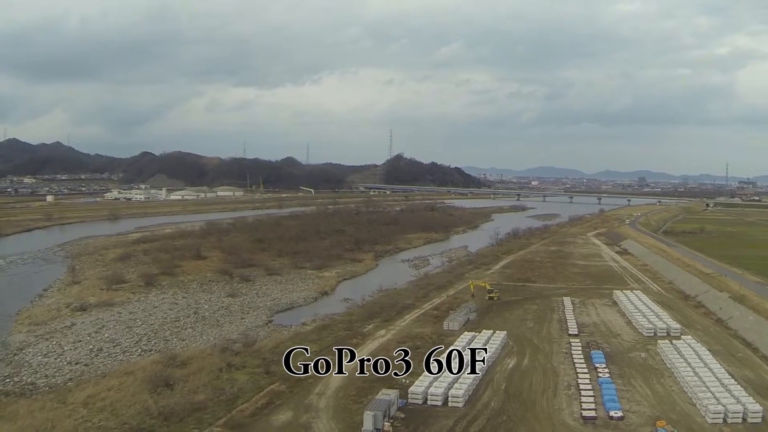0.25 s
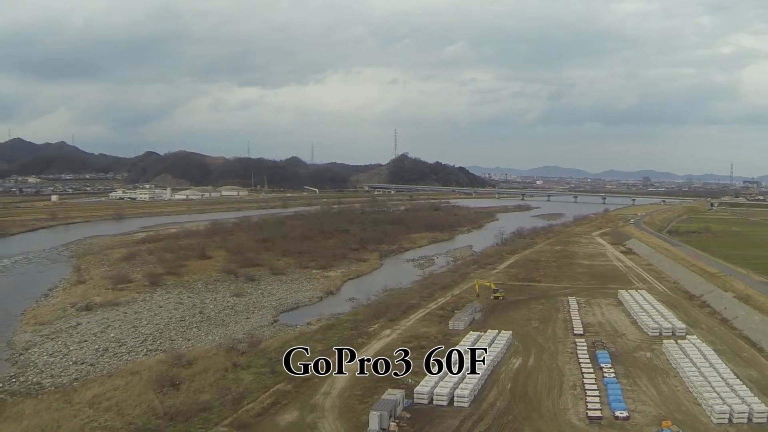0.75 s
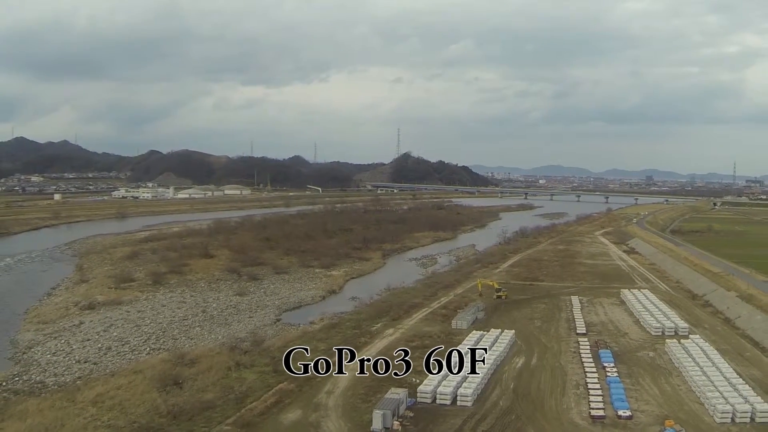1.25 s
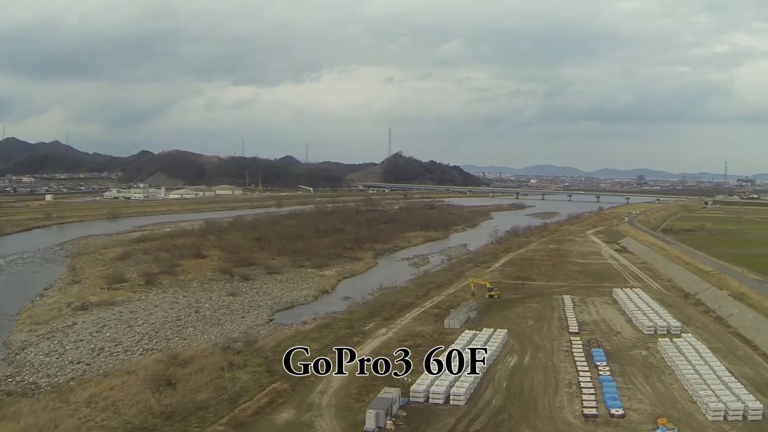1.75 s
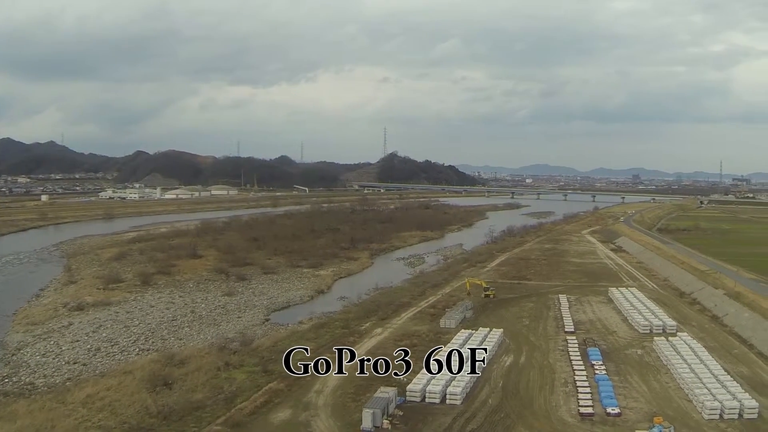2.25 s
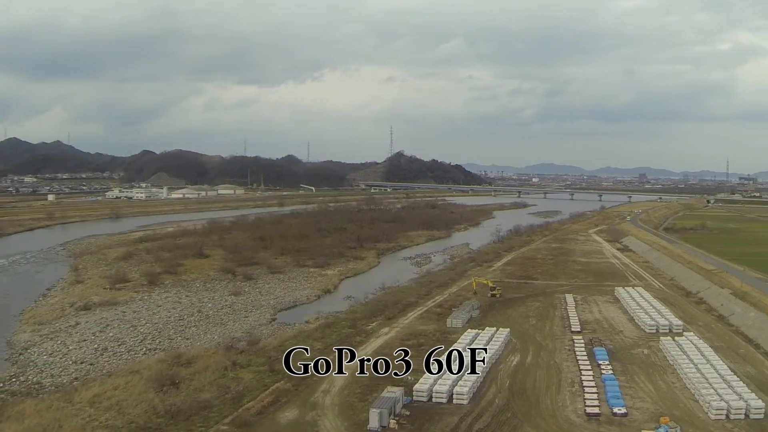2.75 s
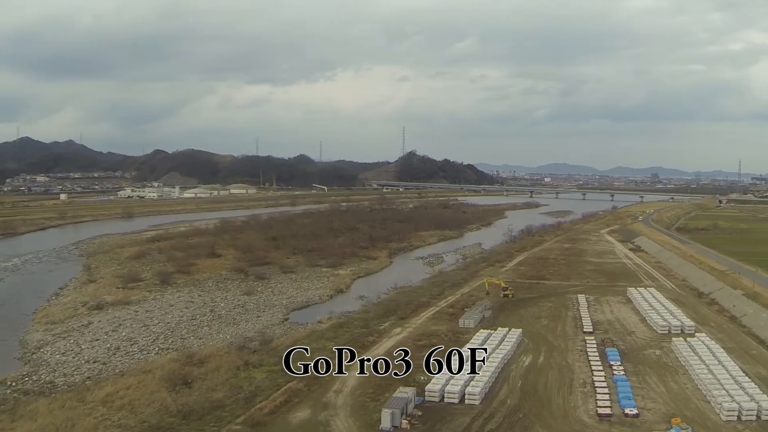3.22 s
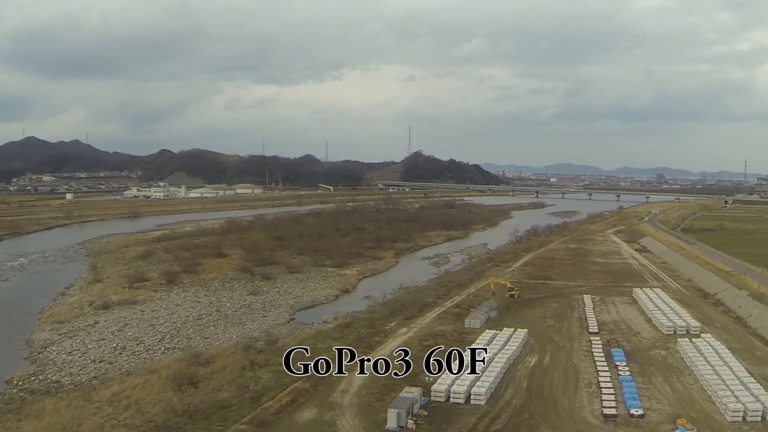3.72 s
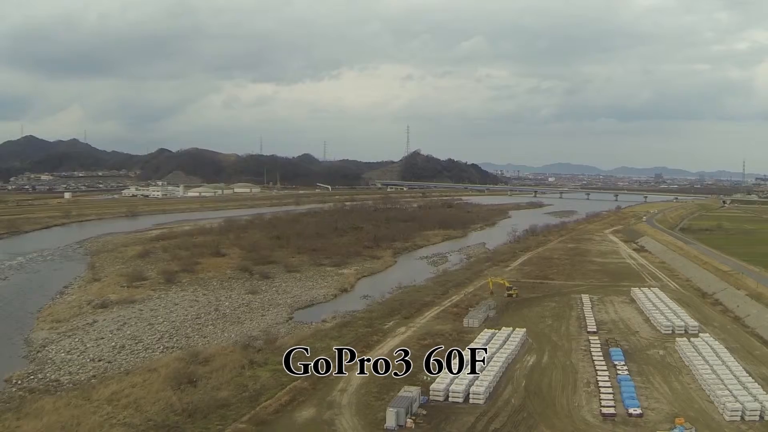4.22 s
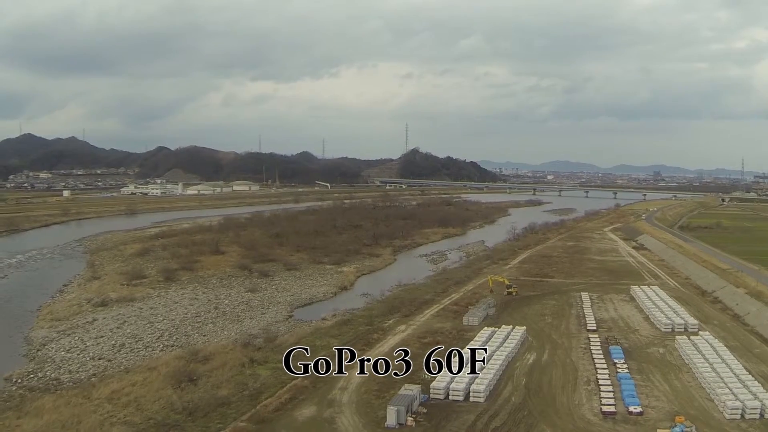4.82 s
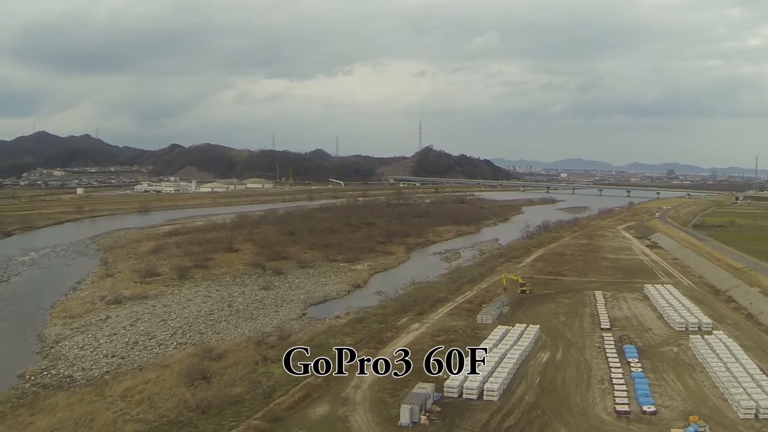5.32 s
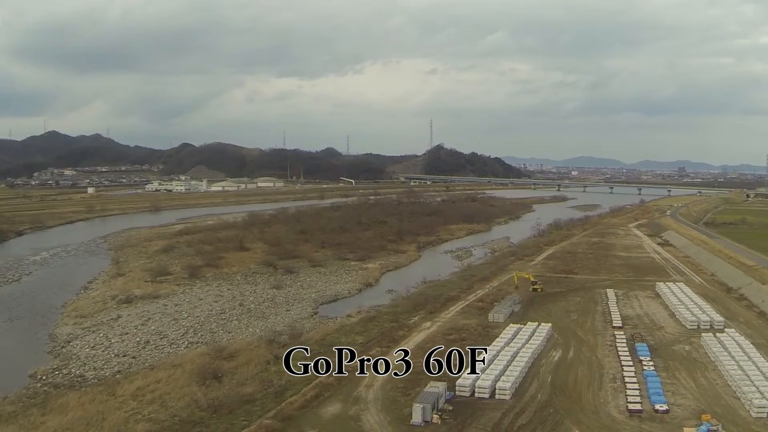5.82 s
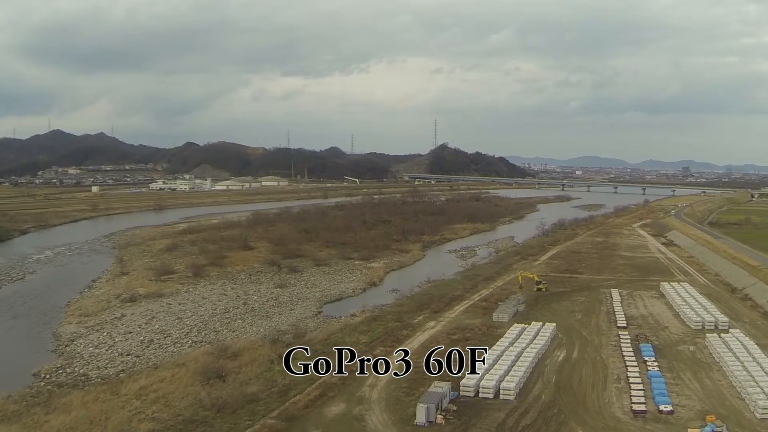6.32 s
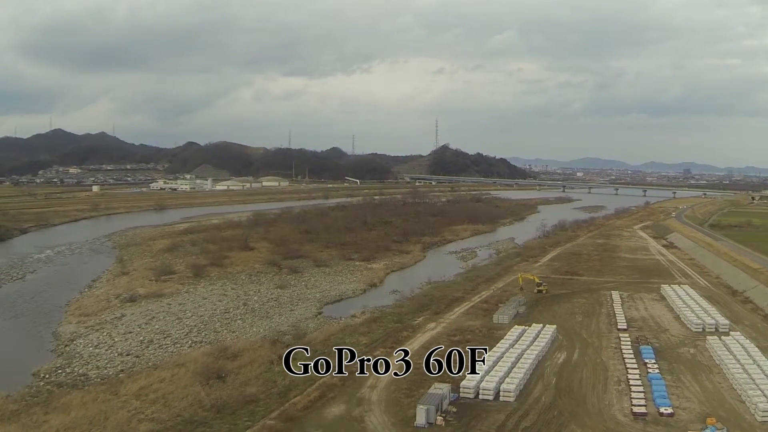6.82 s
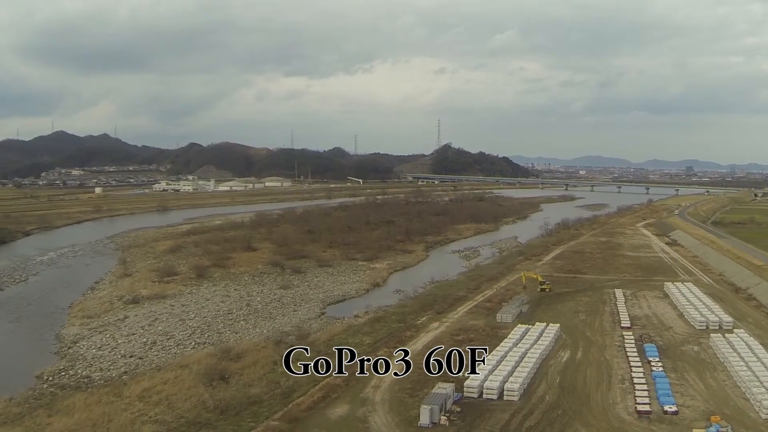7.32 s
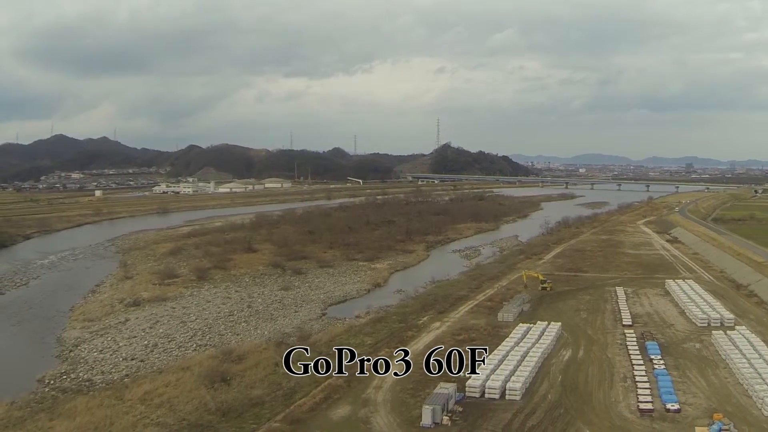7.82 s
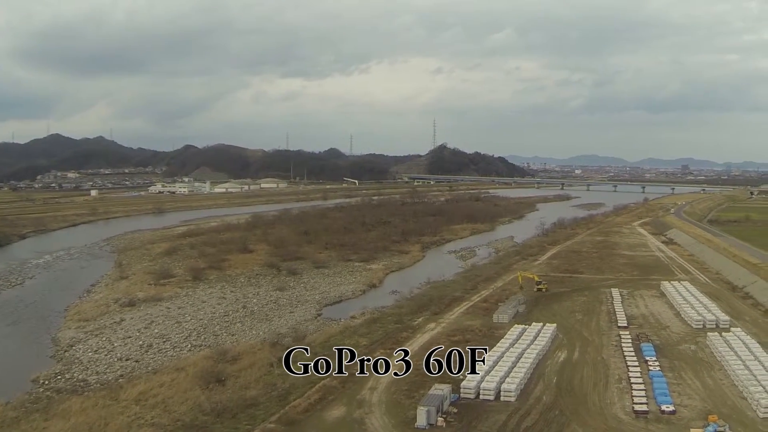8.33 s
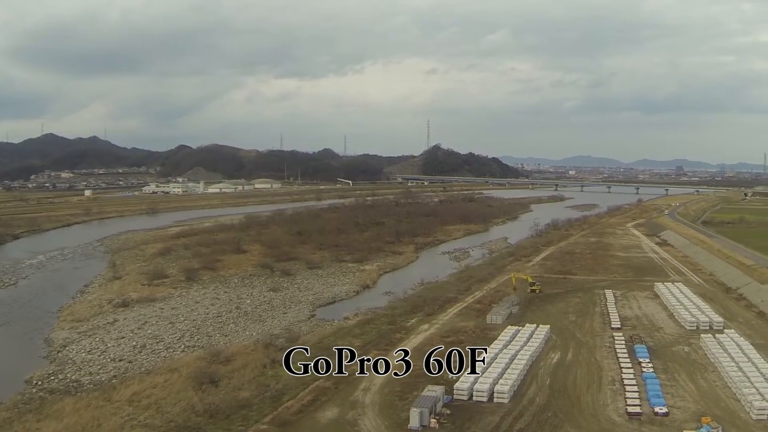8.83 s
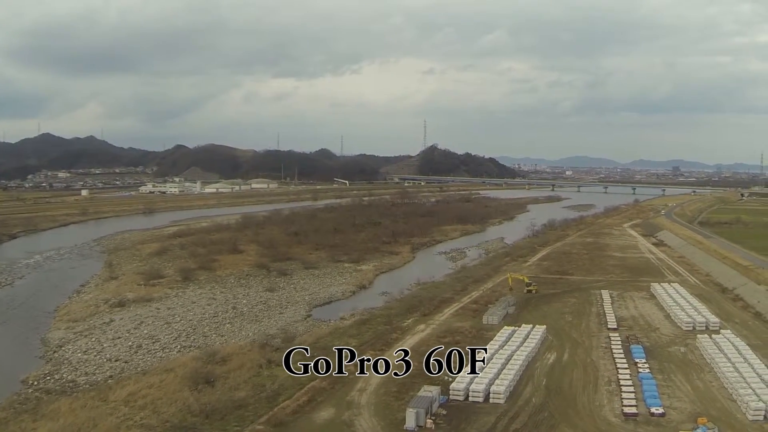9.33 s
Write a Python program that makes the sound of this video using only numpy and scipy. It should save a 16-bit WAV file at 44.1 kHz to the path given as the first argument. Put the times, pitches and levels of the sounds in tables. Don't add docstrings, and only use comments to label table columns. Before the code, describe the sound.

A continuous, very close propeller drone fills the sound, slightly detuned blades throbbing against one another, with rough fluttering air and steady piercing whistles high above. The opening wavers more and rushes roughly, then the hum settles. Open-air wind grows heavier, knocking and puffing against the craft-mounted microphone in irregular bursts until the end, its automatic level ducking and recovering. No distinct ground sounds emerge.

```python
import sys
import numpy as np
from scipy import signal
from scipy.fft import rfft, irfft
from scipy.io import wavfile
from scipy.ndimage import uniform_filter1d

SR = 44100
rng = np.random.default_rng(int(sys.argv[2]) if len(sys.argv) > 2 else 0)


def nominal_scale(level):
    x = np.asarray(level, float) / 20
    return 10 ** x


def file_out(sig):
    cols = np.atleast_2d(sig).T
    lim = np.clip(cols, -1, 1)
    pcm = np.round(lim * 32767).astype(np.int16)
    wavfile.write(sys.argv[1], SR, pcm)


N = 421596
T = np.arange(N) / SR

# t/s, f/Hz
NEAR_RATE = [(0.0, 195.55), (0.25, 187.7), (0.5, 200.89), (0.77, 188.02), (1.02, 193.13), (1.84, 190.04),
             (2.38, 191.28), (2.7, 181.46), (3.43, 188.85), (3.67, 196.11), (4.07, 191.74), (4.21, 195.7),
             (4.8, 194.0), (5.78, 201.08), (7.19, 199.85), (8.0, 201.65), (9.2, 192.9), (9.56, 196.5)]
SECOND_RATE = [(0.0, 178.05), (0.26, 175.12), (0.4, 181.99), (1.12, 172.57), (1.53, 181.21), (2.23, 181.49),
               (2.75, 175.72), (3.51, 171.01), (3.65, 173.38), (4.55, 175.53), (4.73, 178.62),
               (5.6, 169.37), (6.33, 167.22), (7.29, 167.09), (7.61, 169.27), (8.51, 171.68), (8.64, 173.3),
               (9.56, 176.43)]
THIRD_RATE = [(0, 183.5), (.14, 186), (.6, 180.3), (1.1, 180.3), (1.42, 184.6), (1.6, 192), (2.4, 192),
              (2.82, 181.3), (3.08, 184), (3.6, 182.3), (4.28, 182.8), (4.56, 187.5), (5.03, 188),
              (5.56, 181.8), (6.6, 181.1), (7.3, 180.6), (7.95, 184.3), (9.56, 185.8)]
# t/s, change of f/Hz
NUDGES = [(.29, -1.2), (.42, 1.5), (1.25, 1), (1.86, -5.5), (3.35, -3.6), (3.45, -3.6), (5.42, 1.2),
          (3.9, 1.4), (4.07, -1.6), (4.17, 1.6), (4.7, -2.2), (5.68, .6), (5.9, .7), (6.1, .7), (6.38, 1),
          (6.9, -2.4), (7.07, 1.2), (7.46, 1.4), (7.57, -.9), (7.96, 1.6), (8.21, -1.8), (8.47, -1.2),
          (8.8, -1.9), (9.1, 1.4), (9.38, 1.4)]
START_TURNS = [
    [.347],
    [.908],
    [0],
]
HUM_DB = [-19.5, -23.5, -39.5]
HARMONICS_DB = [
    [0.5, -9, -15, -20, -22, -29, -31.5, -35],
    [1.5, -13, -26, -31],
    [-3, -4, -10.5],
]
# t/s, level added to each further harmonic/dB
BITE = [(0, -.5), (.4, 2.2), (.6, 2.2), (.8, 0), (3.2, 0), (3.6, .8), (3.95, -.6), (4.5, 1), (4.85, .8),
        (5.2, -.8), (6, 0), (7, -1.2), (8.1, -1.2), (8.7, 1), (9.56, .3)]
# f/Hz, half width/Hz, lift/dB
FRAME_MODES = [
    (540, 18.5, 4),
    (724, 19, -6.5),
]
# f/Hz, level/dB, starting phase/turn, warming creep/(Hz/s)
DRIVERS = [
    (8028.51, -43.5, .85, 0),
    (8045.716, -41.5, .53, 0),
    (8048.981, -36.7, .78, 0),
    (8085.59, -35, .51, .117),
    (8088.61, -46, .52, 0),
]
SIDE_TONES = [(0, 3, 1), (0, 3, 2), (0, 3, 3), (0, 3, 7), (0, 3, -7), (1, 0, 2), (1, 0, 3), (1, 0, -7),
              (2, 1, 1), (2, 1, 7), (2, 1, -7), (2, 1, -10.5), (2, 1, -14), (2, 1, -17.5), (2, -1, 21)]
SIDE_TONES_DB = [-64, -58, -60, -59, -62, -63, -64, -58, -64, -55, -58, -58, -61, -48.5, -48.5]
WHINE_DB = [-50, -41, -32]
# f/Hz, level per Hz/dB
HISS_SPECTRUM = [(1500, -3), (2500, -11.5), (4500, -6.5), (5500, -10.5), (7600, -13), (10000, -15.5),
                 (13000, -20.5), (15200, -26.5), (15400, -70)]
TEAR_SPECTRUM = [(150, -5), (400, 0), (1000, 1.5), (2000, 2.5), (3500, -3), (6000, -13), (12000, -28.5),
                 (15400, -70)]
# t/s, tearing level/dB
LOAD = [(0, -24.5), (.25, -26), (.5, -23.5), (1.15, -26), (1.3, -26), (1.5, -27.5), (1.62, -24.5),
        (2.05, -27.5), (2.9, -24.5), (3.22, -26), (3.32, -29.5), (4.1, -30), (4.75, -28.5), (5.3, -31),
        (5.8, -30), (7.2, -30), (8.8, -29), (9.56, -32)]
# f/Hz, level per Hz/dB
RUMBLE_SPECTRUM = [(8, 1), (25, -2.5), (60, 1.5), (110, -3.5), (170, -10.5), (300, -27), (600, -54.5)]
FLUTTER_SPECTRUM = [(60, -12), (150, 2), (280, 0), (500, -6), (900, -16), (1600, -31), (3000, -50)]
# t/s, level/dB
GUST = [(0, -26.5), (.5, -32.5), (.77, -27), (1.05, -30), (1.5, -23), (2.0, -20.5), (2.15, -28.5),
        (2.5, -27), (3.0, -22), (3.4, -21), (4.85, -18.5), (5.5, -21), (6.0, -21), (6.9, -18.5),
        (7.3, -21.5), (7.9, -17.5), (9.1, -21.5), (9.56, -22)]
# t/s, depth/dB
DUCKS = [(1.36, 3.5), (1.76, 1.5), (3.34, 2), (3.83, 1), (3.96, 3), (4.18, 2), (4.39, 0.6), (4.9, 6.5),
         (5.04, 1.5), (5.12, 5.5), (5.41, 5.0), (5.51, 2), (5.9, 3), (6.09, 2.1), (6.33, 4), (6.6, 2.8),
         (6.8, 9.5), (7.1, 2.5), (7.45, 0.7), (7.7, 5.5), (7.97, 3), (8.08, 3), (8.24, 3), (8.37, 3.5),
         (8.59, 2.7), (8.79, 0), (8.97, 8), (9.43, 2)]
# t/s, peak level/dB
THUMPS = [(3.36, -16.5), (3.458, -13), (4.139, -15), (4.295, -13.5), (5.056, -12), (5.143, -15.5),
          (5.345, -19), (5.394, -16), (5.493, -14), (5.898, -21), (5.91, -12.5), (5.987, -16), (6.08, -17),
          (6.375, -23), (6.606, -19), (6.756, -16), (6.788, -13), (6.868, -18), (6.917, -16), (7.854, -21),
          (7.986, -15), (8.036, -15), (8.079, -14.5), (8.347, -13.5), (8.404, -20), (8.439, -20),
          (8.493, -19), (9.403, -15), (9.442, -14.5), (9.486, -20.5)]


def curve(rows):
    s, *columns = np.transpose(rows)
    return np.array([np.interp(T, s, c) for c in columns])


def colour(x, points, lo_hz=20, hi_hz=15000):
    hz = np.fft.rfftfreq(N, 1 / SR)
    f, db = np.transpose(points)
    z = rfft(x) * nominal_scale(np.interp(np.log(hz + 1), np.log(f + 1), db))
    band = (hz > lo_hz) & (hz < hi_hz)
    return irfft(z, N) * N / np.sqrt(2 * np.sum(abs(z[band]) ** 2))


def drift(hz):
    count = N // 64 + 2
    z = rfft(rng.standard_normal(count)) / (1 + (np.fft.rfftfreq(count, 64 / SR) / hz) ** 4)
    smooth = irfft(z, count)
    return np.interp(np.arange(N) / 64, np.arange(count), smooth / smooth.std())


def tone(turns, db):
    return np.sqrt(2) * nominal_scale(db) * np.cos(2 * np.pi * turns)


def blade_rates():
    inertia_s, nudge_s = .15, .07
    wanted = np.vstack([curve(NEAR_RATE), curve(SECOND_RATE), curve(THIRD_RATE)])
    rate = uniform_filter1d(wanted, round(inertia_s * SR), axis=1)
    rate[2] += sum(hz * np.exp(-((T - s) / nudge_s) ** 2) for s, hz in NUDGES)
    rate[2] *= 1 + .0008 * drift(25)
    return rate


def gain_control():
    fall_s, back_s = 0.034, 0.1
    gain_db = 0
    for s, depth_db in DUCKS:
        fall = np.clip((T - s) / fall_s + 1, 0, 1)
        recovery = np.exp(-np.maximum(T - s, 0) / back_s)
        gain_db = gain_db - depth_db * fall * recovery
    return gain_db


def hum(turns, duck_db):
    out, bite_db = 0, curve(BITE)[0]
    for turn, db, harmonics in zip(turns, HUM_DB, HARMONICS_DB):
        for k, rel_db in enumerate(harmonics):
            sharp_db = k * bite_db + (1.15 + .5 * k) * drift(24)
            hz = (k + 1) * np.gradient(turn) * SR
            for f, width, lift_db in FRAME_MODES:
                sharp_db += lift_db * np.exp(-((hz - f) / width) ** 2)
            lag = .22 * k + .03 * k * drift(14)
            out = out + tone((k + 1) * turn + lag, db + rel_db + sharp_db + 0.77 * duck_db)
    return out


def motors(turns, rate, duck_db):
    housing_hz, housing_width_hz = 5064, 58
    out = sum(tone(hz * T + creep * T ** 2 / 2 + start, db) for hz, db, start, creep in DRIVERS)
    stumble = 1. * (T > 3.915) * (T < 4.01)
    pull = [1, 1, 1 - uniform_filter1d(stumble, size=900)]
    for (rotor, driver, k), db in zip(SIDE_TONES, SIDE_TONES_DB):
        carrier_hz = DRIVERS[driver][0] * (driver >= 0)
        out += pull[rotor] * tone(carrier_hz * T + k * turns[rotor], db + 2.5 + 2 * drift(9))
    for turn, hz, db, on in zip(turns, rate, WHINE_DB, pull):
        ring = 1 / np.sqrt(1 + (2 * (28 * hz - housing_hz) / housing_width_hz) ** 2)
        out += on * ring * tone(28 * turn, db + 1.5 * drift(10))
    return out * nominal_scale(duck_db)


def blade_passes(turns, sharp, uneven_db):
    power = 0.097
    for turn, share in zip(turns + .55, (1, .35, .15)):
        chance = np.clip(rng.standard_normal(2500), -2, 2)
        strength = nominal_scale(uneven_db * chance)[np.round(turn).astype(int)]
        flare = np.exp(sharp * (np.cos(2 * np.pi * turn) - 1))
        power = power + share * strength ** 2 * flare
    return np.sqrt(power) * rng.standard_normal(N)


def air(turns, hiss_db, tear_db):
    hiss = colour(blade_passes(turns, sharp=1.14, uneven_db=2.0), HISS_SPECTRUM, 9780, 14300)
    ragged = blade_passes(turns, sharp=5.2, uneven_db=1.5) * nominal_scale(0.77 * drift(26))
    tear = colour(ragged, TEAR_SPECTRUM, 877, 5200)
    return nominal_scale(hiss_db) * hiss + nominal_scale(tear_db + 1.0) * tear


def wind(rumble_db, flutter_db):
    rumble = colour(rng.standard_normal(N) * nominal_scale(2.5 * drift(20)), RUMBLE_SPECTRUM, 20, 140)
    arrivals = rng.random(N) < 260 / SR
    eddies = arrivals * rng.standard_normal(N) * nominal_scale(1.8 * drift(30))
    flutter = colour(eddies, FLUTTER_SPECTRUM, 242, 286)
    return nominal_scale(rumble_db + 1.5) * rumble + nominal_scale(flutter_db - 3.0) * flutter


def thumps():
    out, u = np.zeros(N), np.arange(-300, 700) / SR
    puff_band = signal.butter(2, [450, 1250], "band", fs=SR)
    small_s = np.transpose(THUMPS)[0] + rng.uniform(-.09, .05, len(THUMPS))
    events = THUMPS + [(s, -19.5) for s in small_s]
    for (s, db), (sign, size) in zip(events, rng.random((len(events), 2))):
        width_s = .0004 * (.8 + .4 * size)
        kick = np.exp(-abs(u) / width_s) - .4 * np.exp(-((u - .0012) / .0016) ** 2)
        puff = signal.lfilter(*puff_band, rng.standard_normal(len(u))) * np.exp(-abs(u - .003) / .004)
        at = round(s * SR) - 320
        out[at:at + len(u)] += nominal_scale(db + 14) * (np.sign(sign - .6) * kick + .6 * puff)
    return signal.lfilter(*signal.butter(2, 3200, fs=SR), out)


def squeak():
    start_s, length_s, from_hz, to_hz, db = 3.905, .028, 3700, 4450, -30
    u = np.clip((T - start_s) / length_s, 0, 1)
    return np.sin(np.pi * u) * tone(np.cumsum(from_hz + (to_hz - from_hz) * u) / SR, db)


def scene():
    rate, gain_db = blade_rates(), gain_control()
    load_db, gust_db = curve(LOAD)[0], curve(GUST)[0]
    turns = START_TURNS + np.cumsum(rate, axis=1) / SR
    swell_db = 0.54 * drift(4.8)
    duck_db = 0.99 * (gain_db - gain_db.mean() + swell_db)
    hiss_db = -43.5 + gain_db + swell_db + 0.35 * (load_db - load_db.mean())
    tear_db = load_db + 1.29 * gain_db
    craft = hum(turns, duck_db) + motors(turns, rate, duck_db) + air(turns, hiss_db, tear_db)
    flutter_db = -11.5 + gust_db + 0.4 * (gust_db - gust_db.mean())
    flutter_db = flutter_db + 2.0 * drift(6) + .4 * gain_db
    breeze = wind(gust_db + 0.19 * gain_db, flutter_db)
    return (craft + breeze + thumps() + squeak())[None]


def low_pass(x):
    return signal.sosfilt(signal.butter(12, 15350, fs=SR, output="sos"), x)


def record(dry):
    mix = 1.52 * np.tanh(dry / 1.723)
    return low_pass(mix)


dry = scene()
out = record(dry)
file_out(out)
```